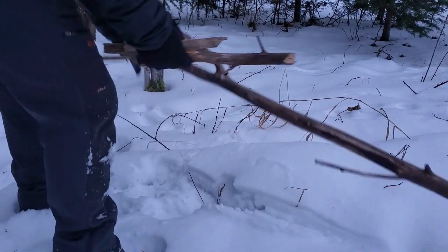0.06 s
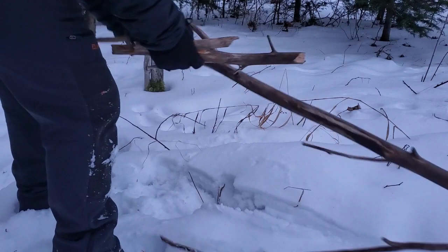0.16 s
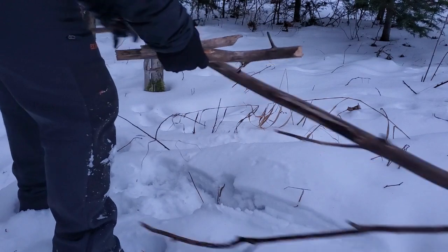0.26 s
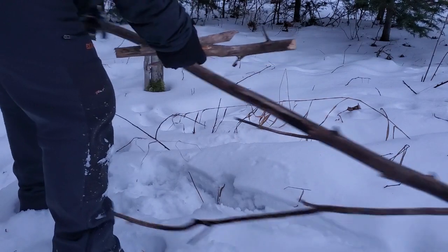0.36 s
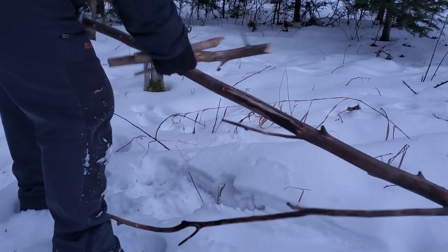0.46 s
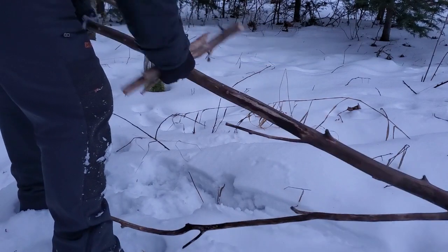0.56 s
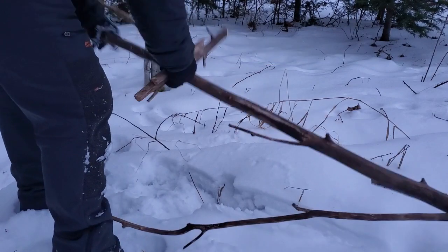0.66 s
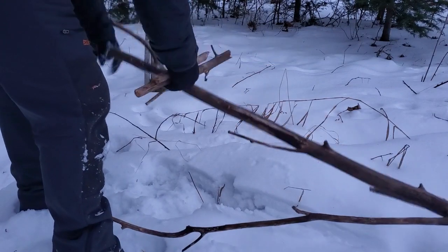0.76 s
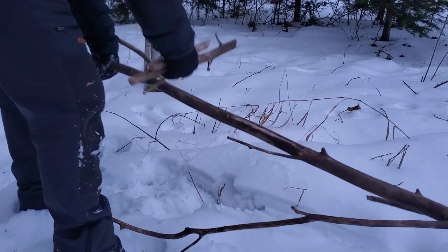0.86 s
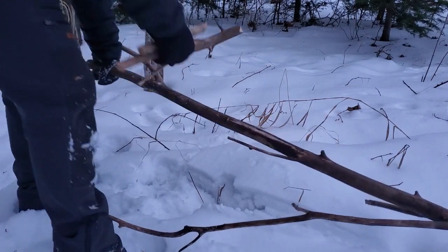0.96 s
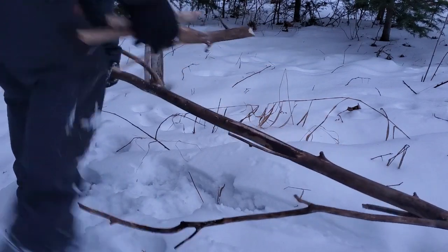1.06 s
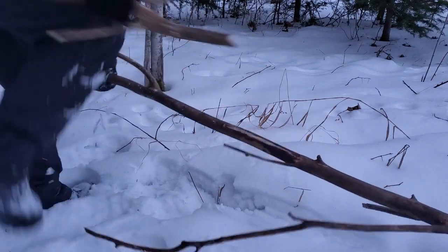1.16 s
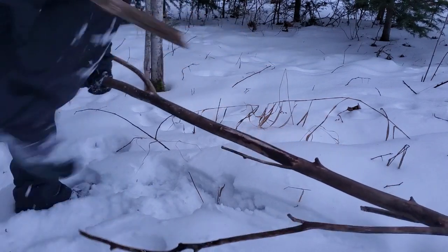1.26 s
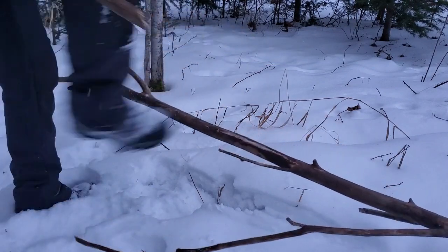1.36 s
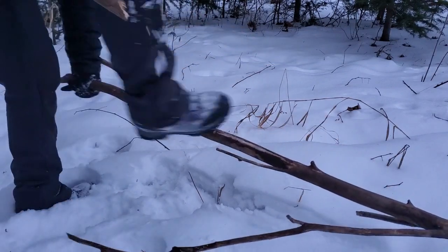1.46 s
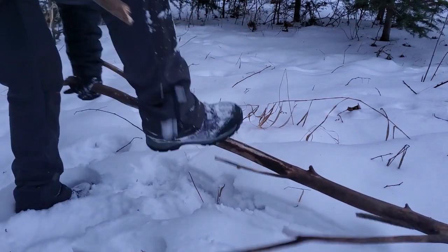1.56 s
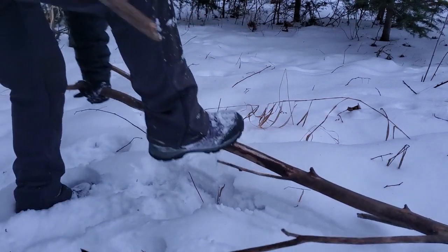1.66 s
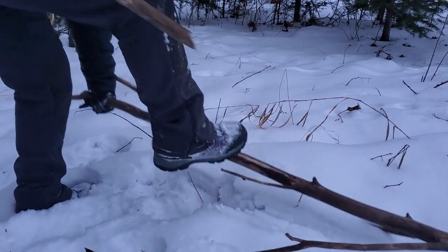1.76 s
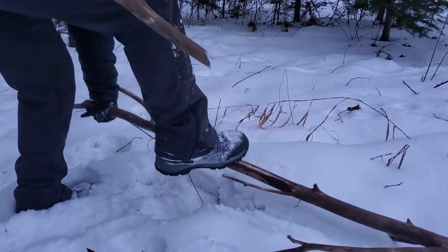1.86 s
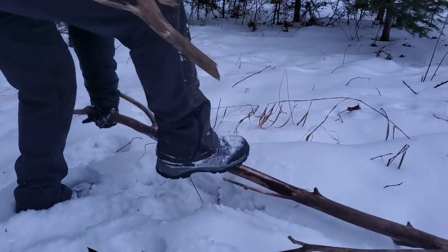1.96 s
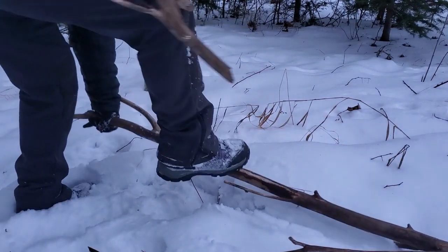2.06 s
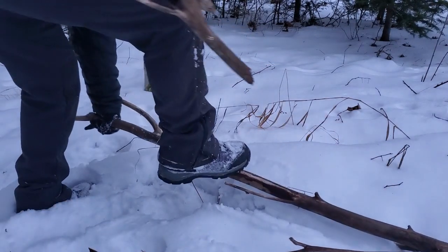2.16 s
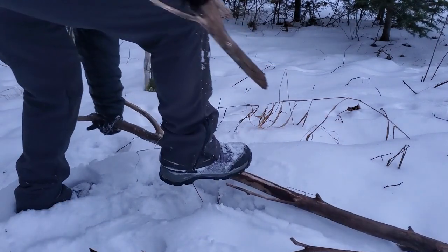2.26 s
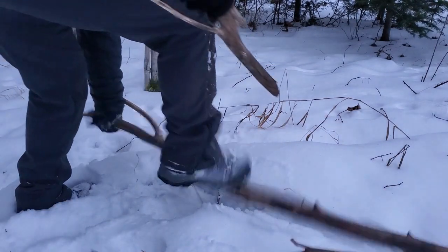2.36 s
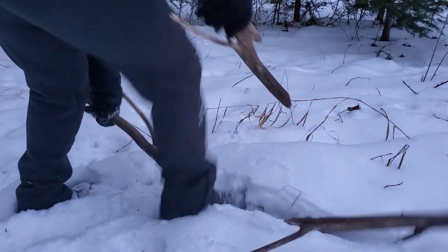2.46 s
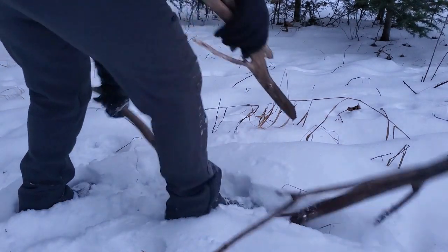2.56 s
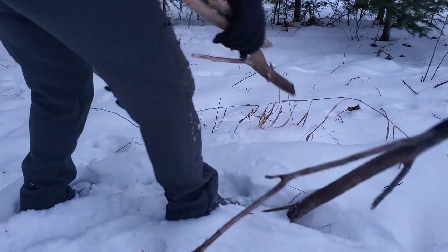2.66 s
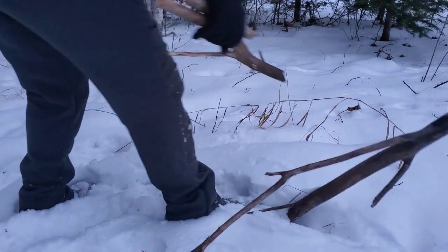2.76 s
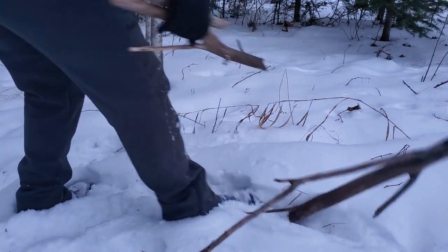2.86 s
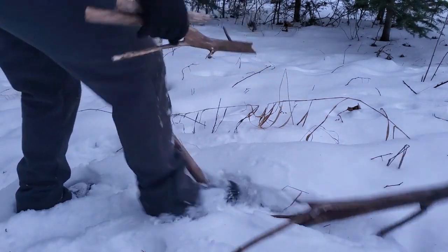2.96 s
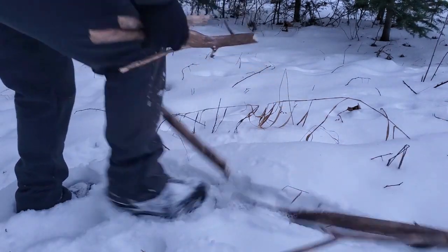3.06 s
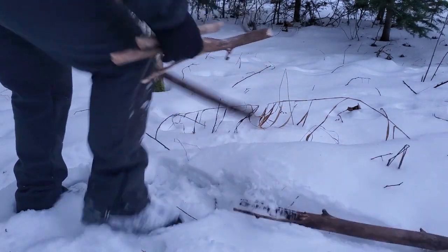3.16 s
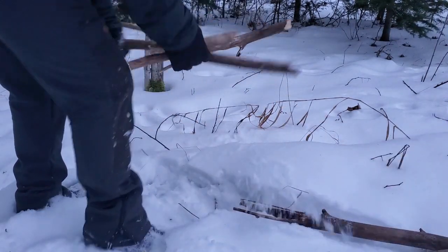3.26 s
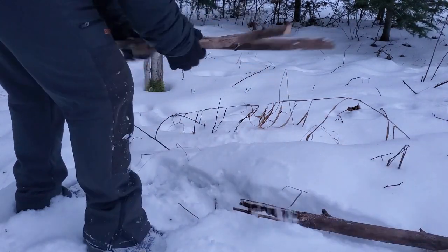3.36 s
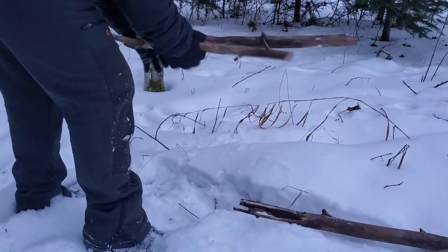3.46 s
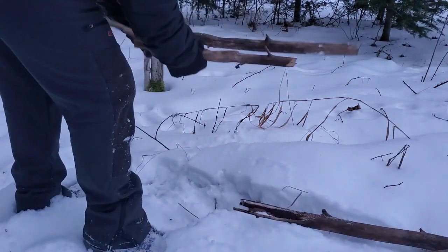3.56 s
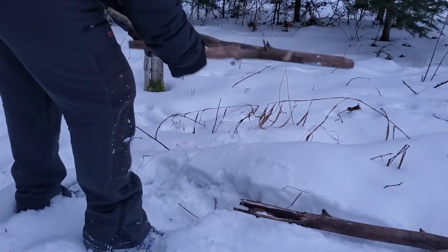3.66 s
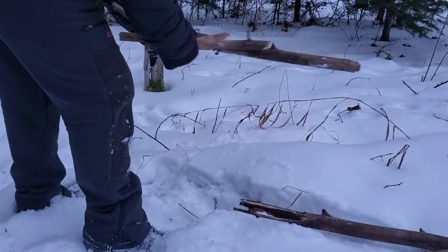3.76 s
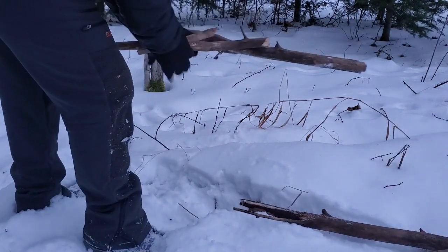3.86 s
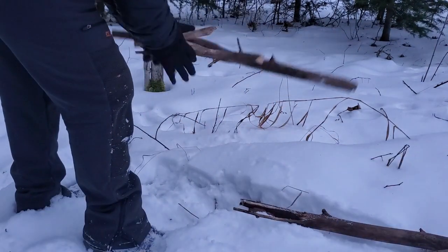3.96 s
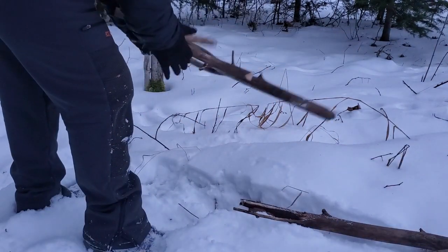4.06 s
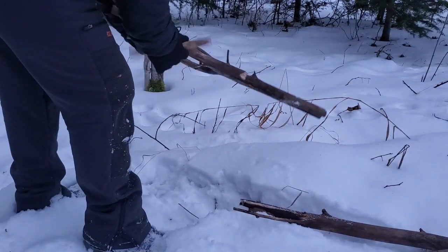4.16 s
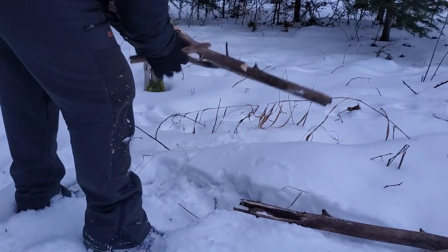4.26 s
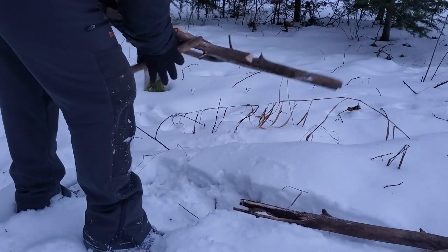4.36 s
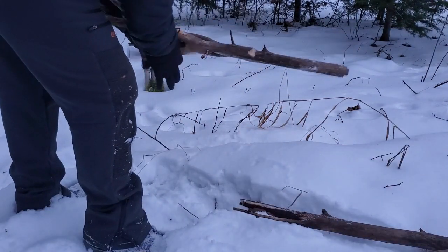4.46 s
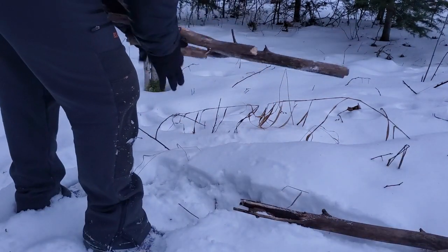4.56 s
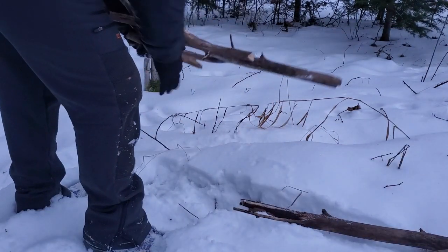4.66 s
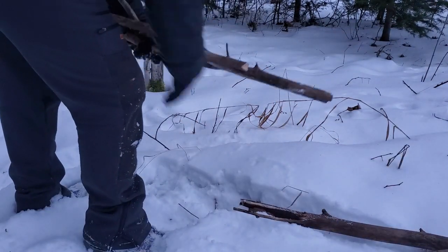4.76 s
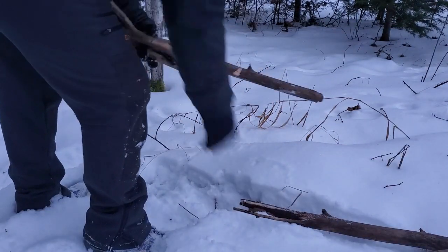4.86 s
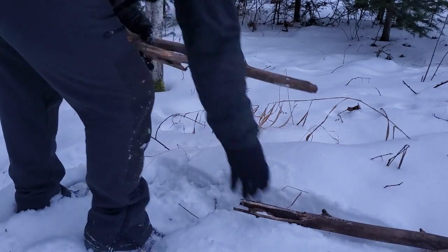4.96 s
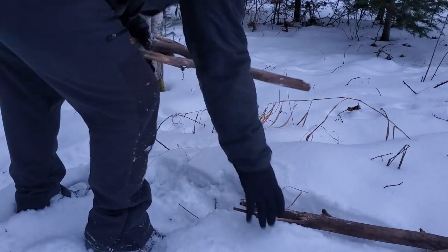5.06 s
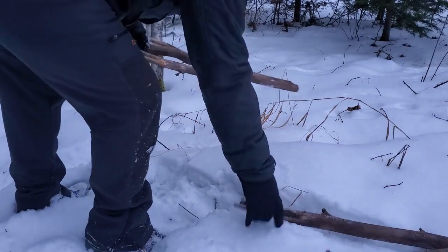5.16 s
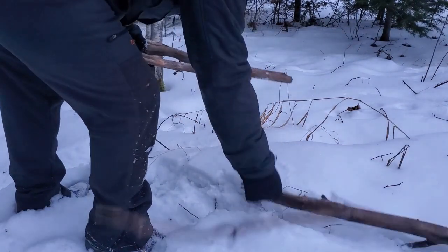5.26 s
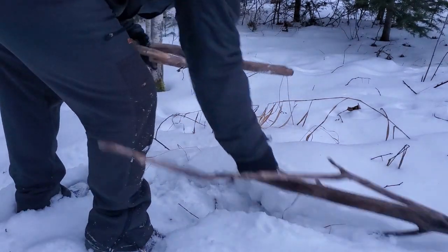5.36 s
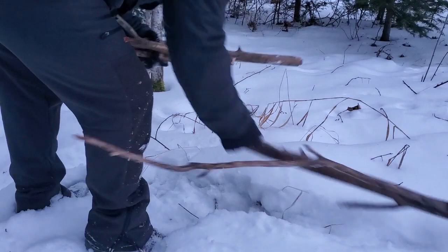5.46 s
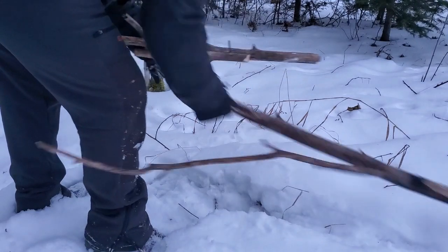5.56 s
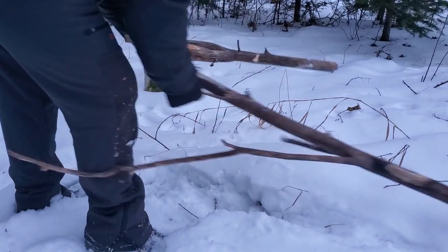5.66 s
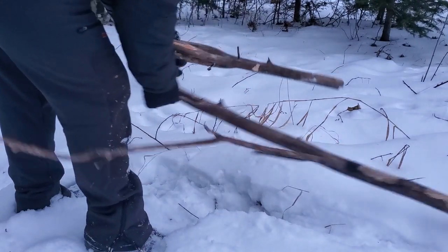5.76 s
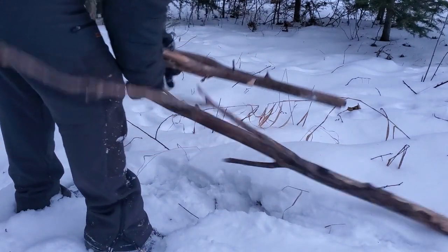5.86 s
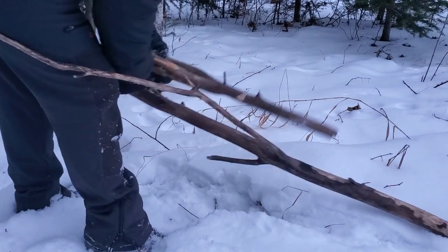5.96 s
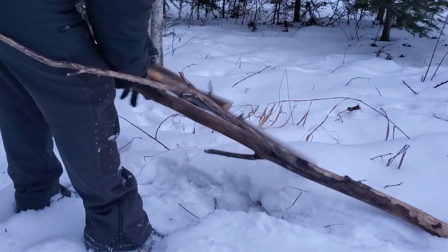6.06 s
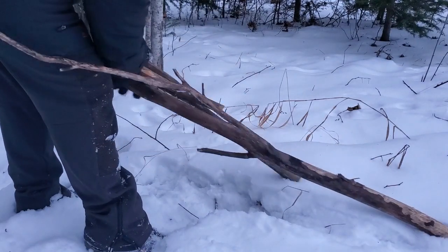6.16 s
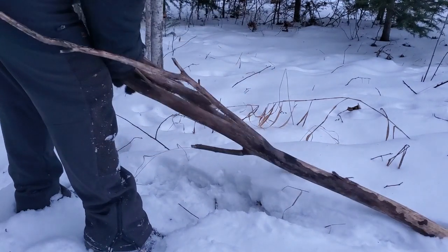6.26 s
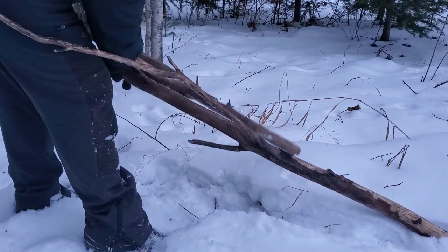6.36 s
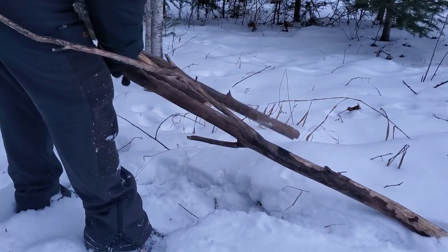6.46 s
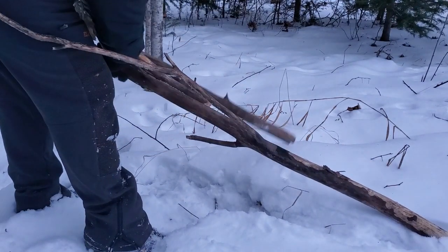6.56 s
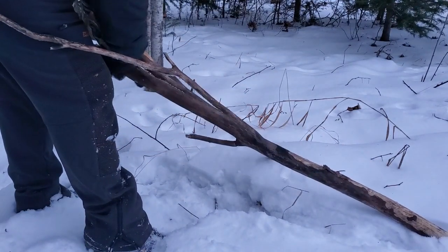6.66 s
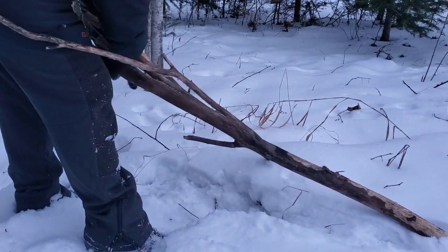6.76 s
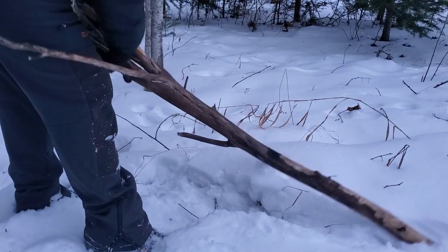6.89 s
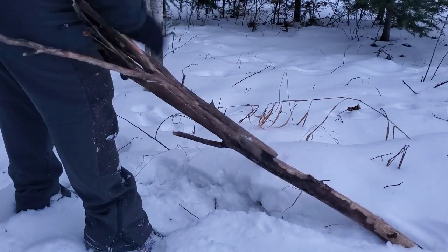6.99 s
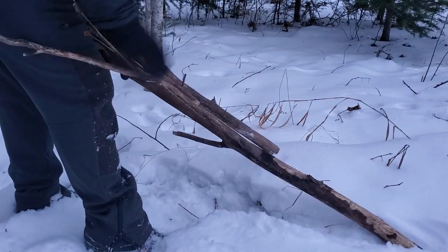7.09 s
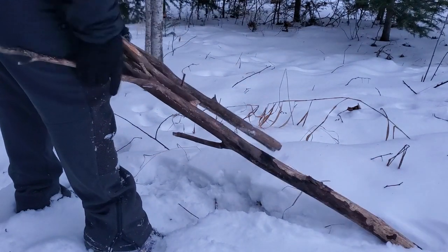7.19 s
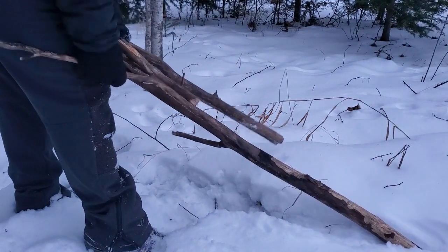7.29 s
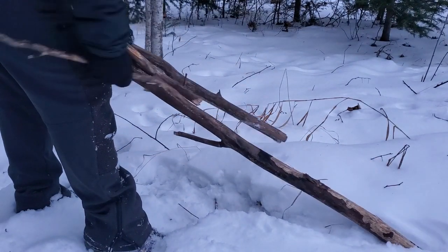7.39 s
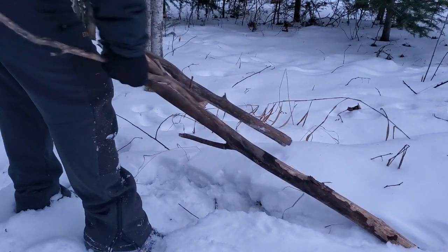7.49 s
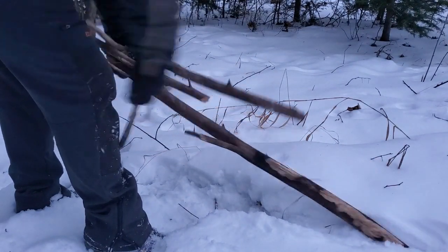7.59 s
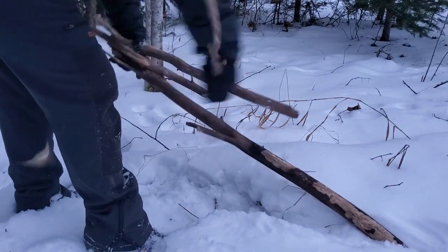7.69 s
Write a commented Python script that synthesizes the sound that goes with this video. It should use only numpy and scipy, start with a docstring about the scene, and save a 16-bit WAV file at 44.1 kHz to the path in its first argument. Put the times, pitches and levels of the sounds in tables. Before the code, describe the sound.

A close outdoor microphone in still winter woods picks up very faint hush and low puffs of air rumble. At 0-0.5 s snow crunches and a limb scrapes through a glove with a woody, singing rasp, clothes rustling. Near 1.1 s come faint crunches, then at 1.5-1.85 s a soft boot thud, snow and a small knock. From 2.0 to 2.2 s the sole grinds and slips in tiny jerks on bark. Fibres tick at 2.28 s; the limb cracks hard at 2.37 s and its end at 2.46 s, brighter, with a low thud, crunch and brief tree echo. Snow crunches again at 2.95-3.3 s. From 3.4 to 7.2 s there are sparse, quiet hollow stick knocks, bark rubs and rustling, with a clearer knock at 5.7 s and an air puff near 4.4 s. Splinters scrape at 7.4 s, a thin stick snaps loudly at 7.52 s, knocks at 7.55 s, and everything settles.

```python
"""Snapping dead wood in snow

A boot bears down on a dry limb until its fibres tick and it breaks in two places; a thin stick is snapped by hand.
Cracks are torn noise bursts over ringing wood modes; knocking sticks add ticks, hollow rings and rough chatter.
Snow, bark, gloves and clothes are clumped grains of friction shaped by spectra and resonances.
Trunks send back cracks and knocks as a fading noise tail; air rumbles on the microphone over a faint hush."""
import sys
import numpy as np
from scipy import signal
from scipy.fft import rfft, irfft, next_fast_len
from scipy.io import wavfile
from scipy.ndimage import map_coordinates

SR = 44100
rng = np.random.default_rng(int(sys.argv[2]) if len(sys.argv) > 2 else 0)


def persist_wave(psi):
    """Save psi, clipped to +-1, as 16-bit WAV."""
    counts = np.round(np.clip(psi, -1, 1) * 32767).astype(np.int16)
    wavfile.write(sys.argv[1], SR, np.atleast_2d(counts).T)


N = 340893

# fibres failing in the limb under the boot: t/s, tear level/dB, tear t60/s, ring level/dB
LIMB_CRACKS = [(2.2836, -25.5, 0.0066, -44.5), (2.2882, -19.5, 0.0084, -35.5), (2.2995, -18, 0.0041, -45),
               (2.3664, -8, 0.007, -25.5), (2.3701, -12.5, 0.0088, -30), (2.3754, -8.5, 0.013, -6.5),
               (2.3775, -8, 0.01, -7.5), (2.389, -23.5, 0.011, -27.5), (2.404, -26.5, 0.0064, -32),
               (2.4095, -25.5, 0.0054, -33.5)]
# modes of the limb: f/Hz, level/dB, t60/s
LIMB_MODES = [(766, -26, .04), (1570, -9, 0.0087), (1990, -3, 0.012), (2520, -1.5, 0.024),
              (3134, -5, 0.018), (4700, -6, 0.016), (7220, -7.5, 0.014)]
# the short end breaking off: t/s, tear level/dB, tear t60/s, ring level/dB
END_CRACKS = [(2.4581, -15.5, 0.0091, -20.5), (2.4592, -9.5, 0.01098, -8.5)]
# modes of the short end: f/Hz, level/dB, t60/s
END_MODES = [(896, -20.5, 0.011), (2200, 1, 0.019), (2536, -3.5, .012), (4580, -20.5, .02)]


def limb_break():
    """The limb's fibres tick and give way, then its short end breaks off with a brighter tear."""
    limb = fracture(LIMB_CRACKS, LIMB_MODES, rise=0.00022, sizzle_db=-2.5)
    short_end = fracture(END_CRACKS, END_MODES, rise=.0003, sizzle_db=6.0)
    return limb + short_end


# the thin stick giving way: t/s, tear level/dB, tear t60/s, ring level/dB
STICK_CRACKS = [(7.413, -31, 0.0069, -70), (7.5156, -2.5, 0.0083, -4), (7.518, -20, 0.0061, -13),
                (7.592, -44, 0.013, -35.5)]
# modes of the thin stick: f/Hz, level/dB, t60/s
STICK_MODES = [(170, -29, 0.025), (694, -19, 0.083), (978, -20.5, 0.035), (2215, -2, 0.016),
               (2956, -2.5, 0.017), (3133, 1, 0.011), (3880, -11.5, 0.018), (5500, -6, 0.014)]


def stick_snap():
    """Bent by hand, the thin stick tears its fibres and rings in its own modes."""
    return fracture(STICK_CRACKS, STICK_MODES, rise=0.00019, sizzle_db=4.0)


def fracture(cracks, modes, rise, sizzle_db):
    """Each bundle of fibres tears, and the released strain rings the piece of wood."""
    out, t = np.zeros(N), np.arange(SR // 6) / SR
    onset = 1 - np.exp(-t / rise)  # rise is a time constant in seconds
    for start, tear_db, t60, ring_db in cracks:
        fibres = amp(tear_db) * tear(t, t60, sizzle_db)
        wood = amp(ring_db) * ring(modes, t)
        add(out, start, (fibres + wood) * onset)
    return out


# spectrum of parting fibres: f/Hz, relative level per Hz/dB
TEAR_SPECTRUM = [(100, -18), (600, -11), (1500, -7.5), (3500, -2.5), (6000, -4.5), (7500, 1), (8800, 0.5),
                 (9600, -14), (10600, -20), (12300, -8.5), (14000, -15), (15500, -14)]


def tear(t, t60, sizzle_db=0):
    """Parting fibres give a noise burst that dies within milliseconds; sizzle tilts its treble."""
    fade = amp(-60 * t / t60)
    sizzle = [(7000, 0), (12000, sizzle_db)]
    burst = coloured(fade * rng.standard_normal(len(t)), TEAR_SPECTRUM, sizzle)
    return unit(burst) * np.sqrt(np.mean(fade ** 2))  # the colour leaves the level alone


def ring(modes, t):
    """One sharp blow sets off damped sines, each with a random phase."""
    return sum(amp(db - 60 * t / t60) * np.sin(2 * np.pi * (hz * t + rng.random())) for hz, db, t60 in modes)


# gathered sticks knocking together: t/s, level/dB, pitch f/Hz, ring t60/s, tick level relative to the knock/dB
KNOCKS = [(1.755, -33.5, 2210, .022, -2), (3.425, -44, 2374, 0.014, -5), (3.802, -55.5, 1665, .025, 0),
          (3.86, -35, 932, 0.041, -25), (4.237, -44, 1498, .036, -16), (4.365, -37, 1756, 0.011, -24),
          (4.513, -48, 856, .036, -12), (4.636, -55.5, 873, 0.033, -12.5), (4.836, -52, 1396, 0.065, -18),
          (4.975, -44.5, 907, 0.03, -9), (5.668, -39.5, 1060, 0.035, 0.5), (5.7, -26, 1724, 0.022, -21),
          (6.078, -48, 1005, 0.034, 5.5), (6.455, -42, 2180, .02, -12), (6.459, -47, 920, .07, -14),
          (6.814, -54, 1040, 0.021, 13), (6.867, -50, 1010, 0.025, 9.5), (6.902, -43, 1029, 0.09, 4),
          (6.959, -45.5, 1100, 0.017, 10), (7.184, -50, 1350, .032, -18), (7.548, -25, 1880, 0.014, -20),
          (7.5543, -16, 1114, 0.011, -12)]
# modes of a knocked stick: multiple of the pitch, mean level/dB
BENDING_MODES = [(.36, -13.5), (.55, -9), (.76, -12), (1, -1.5), (1.22, -12.5), (1.6, -13), (2.3, -20.5)]


def knocks(scatter_db, rise, chatter_db, chatter_width):
    """Stick meets stick: a tick, a short hollow ring and a chatter of rough bark."""
    out, t = np.zeros(N), np.arange(SR // 8) / SR
    onset = 1 - np.exp(-t / rise)
    for start, db, pitch, t60, tick_db in KNOCKS:
        modes = [(pitch * k, level + rng.normal(0, scatter_db), t60) for k, level in BENDING_MODES]
        wood = ring(modes, t)
        # chatter_width is the resonance width as a share of the pitch
        body = resonant([(pitch * k, pitch * chatter_width, level) for k, level in BENDING_MODES], floor_db=-50)
        chatter = unit(coloured(rng.standard_normal(len(t)), body)) * amp(chatter_db - 60 * t / t60)
        tick = amp(tick_db) * tear(t, t60=.009)
        blow = wood / np.abs(wood).max() + chatter + tick
        add(out, start, amp(db) * blow * onset)
    return out


# boots and wood pushing through snow: crest t/s, length/s, level/dB, body tilt/dB
CRUNCHES = [(.026, 0.024, -33, -10.5), (.083, 0.078, -34.5, -1.5), (.418, 0.097, -43, -3),
            (1.062, 0.098, -48, 1), (1.19, 0.083, -54.5, 3), (1.566, 0.035, -46, 9.5),
            (1.627, 0.059, -43, -2.5), (1.702, 0.012, -43.5, -19), (1.785, 0.056, -40.5, 0.5),
            (1.827, 0.029, -44, -1), (2.402, 0.038, -34.5, 1), (2.462, 0.083, -29, 1.5),
            (2.51, 0.078, -35, 1.5), (2.955, .016, -39.5, -8), (3.01, 0.12, -43, -1),
            (3.077, .075, -35.5, 2.5), (3.107, 0.013, -41, 16), (3.132, 0.038, -45.5, 4),
            (3.24, .08, -39.5, 7), (3.28, .036, -32, -13)]
# crunch shape: share of length swelling, curvature of swell, curvature of fall, drop at both ends/dB,
# fizz/dB, fizz per body/(dB per dB)
CRUNCH_SHAPE = (.65, 1.5, 1.5, 12, .5, 0.42)
# spectrum of packing snow: f/Hz, relative level per Hz/dB
SNOW_SPECTRUM = [(76, -30.5), (130, -2.5), (202, -6.5), (410, -4), (491, -6.5), (735, -2.5), (2010, -2),
                 (2510, -1), (3750, -6.5), (5080, -6), (5960, -11), (8070, -5.5), (10300, -22.5),
                 (12800, -14), (16000, -23.5)]
TRICKLE_DB, TRICKLE_T60_S = -21, .5  # loose snow falling back, relative to the crunch trail


def snow():
    """Snow packs with a crunch, and loose crumbs trickle after it in proportion."""
    crunch = strokes(CRUNCHES, CRUNCH_SHAPE, [SNOW_SPECTRUM], rate=3500, spread_db=2.5, smooth_db=-2.5,
                     clump_db=1.8, clump_rate=280)
    power_fade = amp(-60 * np.arange(SR) / SR / TRICKLE_T60_S) ** 2
    power_trail = signal.fftconvolve(crunch ** 2, power_fade / power_fade.sum())[:N]
    loosened = np.sqrt(np.abs(power_trail))
    crumb_tilt = [(600, -3), (2400, -2.5)]
    crumbs = unit(coloured(grains(N, rate=1500, spread_db=3.5, smooth_db=0), SNOW_SPECTRUM, crumb_tilt))
    return crunch + amp(TRICKLE_DB) * loosened * crumbs


# the sole bearing down on the limb: crest t/s, length/s, level/dB, body tilt/dB
PRESSES = [(1.998, .06, -44, 1), (2.17, .17, -46, 3)]
# the sole jerking over the bark: crest t/s, level/dB
SLIPS = [(1.974, -49), (2.016, -45), (2.04, -40), (2.082, -44), (2.192, -37), (2.213, -43)]
SLIP_S, SLIP_BODY_DB = 0.023, -1  # length and body tilt that all slips share
# press and slip shapes: share of length swelling, curvature of swell, curvature of fall, drop at both ends/dB,
# fizz/dB, fizz per body/(dB per dB)
PRESS_SHAPE = (0.67, 1, 1, 12, 2, -0.66)
SLIP_SHAPE = (0.14, 1.3, 1.5, 23, 1.1, .1)
# resonances under the sole: f/Hz, width/Hz, level/dB
SOLE_BODY = [(1330, 230, 1), (2260, 220, -6.5), (3300, 320, 0), (4531, 350, -2.5), (8730, 1500, -1.5)]


def sole():
    """The boot grinds on the limb as weight comes on, and slips in short jerks."""
    colour = [SNOW_SPECTRUM, resonant(SOLE_BODY, floor_db=-6.5)]
    grind = strokes(PRESSES, PRESS_SHAPE, colour, rate=1100, spread_db=5, smooth_db=-6.5,
                    clump_db=2.0, clump_rate=200)
    slip_rows = [(crest, SLIP_S, db, SLIP_BODY_DB) for crest, db in SLIPS]
    jerks = strokes(slip_rows, SLIP_SHAPE, colour, rate=2600, spread_db=2.6, smooth_db=-6,
                    clump_db=2, clump_rate=290)
    return grind + jerks


# the limb sliding through the glove: t/s, level/dB
DRAG = [(0.1, -31), (0.154, -62), (0.284, -46.5), (0.314, -51.5), (0.418, -42.5), (0.458, -58.5),
        (0.662, -66), (0.668, -57), (0.84, -71)]
# resonances the glove excites in the limb: f/Hz, width/Hz, level/dB
DRAG_BODY = [(940, 110, -14), (1383, 54, 5.5), (2050, 250, 3.5), (2580, 190, 8), (2900, 210, -4),
             (4600, 480, -1.5), (5200, 330, -6.5)]


def drag(clump_db, clump_rate, fade_s):
    """The limb slides through the glove and sings in its resonances."""
    t = np.arange(N) / SR
    first, last = DRAG[0][0], DRAG[-1][0]
    sliding = np.clip(np.minimum(t - first, last - t) / fade_s, 0, 1)
    slips = grains(N, rate=2000, spread_db=3, smooth_db=.5) * amp(clump_db * wobble(N, clump_rate))
    singing = unit(coloured(slips, resonant(DRAG_BODY, floor_db=-39)))
    return sliding * amp(curves(DRAG)[0]) * singing


# bark sliding on gloves, sleeves and other sticks: crest t/s, length/s, level/dB, body tilt/dB
RUBS = [(.535, 0.069, -56, -10), (.875, 0.047, -49.5, -9), (3.428, 0.044, -57.5, -27),
        (3.57, 0.059, -65, -14), (4.075, 0.052, -68.5, 6), (4.978, 0.041, -47, 2), (5.145, .03, -52, -32),
        (5.252, 0.053, -43, -15), (5.284, 0.043, -43, -0.5), (5.585, 0.11, -57, 3.5),
        (5.7, 0.087, -52.5, 5), (5.819, 0.038, -56.5, -1), (5.88, .09, -57.5, -5), (6.098, 0.047, -53.5, 8),
        (6.235, 0.089, -61, -1), (6.826, 0.032, -53, -6), (6.907, .06, -43, -8.5), (6.985, 0.073, -58, -2)]
# rub shape: share of length swelling, curvature of swell, curvature of fall, drop at both ends/dB,
# fizz/dB, fizz per body/(dB per dB)
RUB_SHAPE = (.24, 1.4, 1.5, 12.5, 5.8, 0.12)
# spectrum of rubbed bark: f/Hz, relative level per Hz/dB
BARK_SPECTRUM = [(130, -54), (220, -17), (693, -7.5), (758, -8), (1010, -9.5), (1280, -1.5), (1790, -6),
                 (2070, -6), (4020, -8.5), (5450, -9.5), (6070, -20), (7950, -8.5), (10600, -37.5),
                 (12400, -22.5), (16000, -37)]
# resonances of the gathered sticks: f/Hz, width/Hz, level/dB
BUNDLE_BODY = [(590, 77, -0.5), (976, 70, 0.5), (1910, 130, -1), (2523, 90, -3), (3130, 260, -0.5),
               (4000, 110, -1.5), (5000, 180, -2)]


def bark_rubs():
    """Bark slides in short strokes that sound through the resonances of the bundle."""
    colour = [BARK_SPECTRUM, resonant(BUNDLE_BODY, floor_db=-6.5)]
    return strokes(RUBS, RUB_SHAPE, colour, rate=2400, spread_db=3.2, smooth_db=-0.5,
                   clump_db=3.0, clump_rate=232)


# the thin stick's splinters dragging apart: crest t/s, length/s, level/dB, body tilt/dB
SPLINTERS = [(7.425, 0.11, -58, 18), (7.483, 0.051, -55.5, 21), (7.53, 0.044, -39, 7)]
# splinter shape: share of length swelling, curvature of swell, curvature of fall, drop at both ends/dB,
# fizz/dB, fizz per body/(dB per dB)
SPLINTER_SHAPE = (0.2, 1.5, 1.6, 9, 10, -0.4)


def splinter_drag():
    """Splinters scrape past each other in sparse, strongly uneven grains."""
    return strokes(SPLINTERS, SPLINTER_SHAPE, [BARK_SPECTRUM], rate=1200, spread_db=5.5, smooth_db=-20.0,
                   clump_db=4.0, clump_rate=310)


def strokes(rows, shape, spectra, rate, spread_db, smooth_db, clump_db, clump_rate):
    """Friction that swells and dies; its grains come in clumps as the surfaces stick and let go."""
    out = np.zeros(N)
    rise_share, rise_power, fall_power, edge_db, fizz_db, fizz_per_body = shape
    for crest, length, db, body_db in rows:
        rise = length * rise_share
        fall = length - rise
        t = np.arange(-2 * rise, 3 * fall, 1 / SR)  # the crest is at zero
        before, after = np.abs(t / rise) ** rise_power, np.abs(t / fall) ** fall_power
        swell = amp(-edge_db * np.where(t < 0, before, after))
        slips = grains(len(t), rate, spread_db, smooth_db) * amp(clump_db * wobble(len(t), clump_rate))
        tilt = [(600, body_db), (2400, 0), (7500, fizz_db + fizz_per_body * body_db)]
        add(out, crest - 2 * rise, amp(db) * swell * unit(coloured(slips, tilt, *spectra)))
    return out


def grains(size, rate, spread_db, smooth_db):
    """Tiny slips of uneven strength, rate a second on average, over a smooth hiss."""
    hits = rng.random(size) < rate / SR
    signs = rng.choice([-1, 1], size)
    strength = amp(spread_db * np.minimum(rng.exponential(size=size), 3))
    hiss = amp(smooth_db) * rng.standard_normal(size)
    return unit(unit(hits * signs * strength) + hiss)


# weight landing in the snow: t/s, level/dB, pitch f/Hz, t60/s
THUDS = [(1.535, -40.5, 227, 0.045), (1.552, -36.5, 249, 0.055), (2.462, -23.5, 181, 0.044),
         (3.108, -39.5, 129.8, 0.14)]


def thuds(rise):
    """Packed snow gives way with a soft, low push."""
    out, t = np.zeros(N), np.arange(SR // 4) / SR
    for start, db, hz, t60 in THUDS:
        add(out, start, ring([(hz, db, t60)], t) * (1 - np.exp(-t / rise)))
    return out


# clothes shifting as the body moves, before trim and flutter: t/s, cloth level/dB, hiss level/dB
RUSTLE = [(0, -46.5, -52.5), (0.5, -60.5, -67.5), (0.95, -67.5, -68.5), (1.33, -74, -75.5), (1.5, -76, -81),
          (1.68, -59, -61), (2.33, -51, -61), (2.56, -43.5, -49.5), (2.8, -60.5, -62), (3.15, -55.5, -56),
          (3.38, -86, -69), (3.68, -86, -89), (3.98, -75, -80.5), (4.72, -79, -85), (5.05, -65.0, -64.0),
          (5.5, -67, -70.5), (5.76, -60.5, -61.5), (6.02, -72.5, -68.5), (6.4, -66, -70.5),
          (6.62, -77.5, -79), (6.87, -65, -66.5), (7.12, -73.5, -80.5), (7.48, -53.5, -58)]
# spectra of cloth and of its hiss: f/Hz, relative level per Hz/dB
CLOTH_SPECTRUM = [(100, -18), (300, -4), (600, -5), (1050, 0), (1800, -2), (2600, -2), (3600, -5),
                  (5000, -27.5)]
HISS_SPECTRUM = [(2800, -24.5), (4200, 2.5), (5400, 2.5), (6300, -5.5), (8400, 2), (9500, -10),
                 (10600, -20.5), (12700, -10.5), (16000, -18)]
SETTLE_S, SETTLE_DB_PER_S = 7.52, 121  # the body comes to rest after the main snap


def rustle(cloth_db, hiss_db, flutter_db, body_floor_db):
    """Winter clothes shift against the sticks with a fluttering level, then settle."""
    cloth_level, hiss_level = curves(RUSTLE)
    settled_db = SETTLE_DB_PER_S * np.maximum(np.arange(N) / SR - SETTLE_S, 0)
    motion_db = flutter_db * wobble(N, rate=39) - settled_db
    body = resonant(BUNDLE_BODY, body_floor_db)
    cloth = unit(coloured(grains(N, rate=2300, spread_db=4.0, smooth_db=2.0), CLOTH_SPECTRUM, body))
    hiss = unit(coloured(grains(N, rate=900, spread_db=5.5, smooth_db=1.5), HISS_SPECTRUM))
    return amp(cloth_level + cloth_db + motion_db) * cloth + amp(hiss_level + hiss_db + motion_db) * hiss


def patchy(x, depth_db, width_hz, life):
    """The contact point wanders, so patches of the spectrum come and go; life is in seconds."""
    z = signal.stft(x, nperseg=512)[2]
    across_pitch = signal.windows.gaussian(61, width_hz * 512 / SR)
    across_time = signal.windows.gaussian(61, life * SR / 256)
    patch = np.outer(across_pitch, across_time)
    field = unit(signal.fftconvolve(rng.standard_normal(z.shape), patch, "same"))
    return signal.istft(z * unit(amp(depth_db * field)), nperseg=512)[1][:N]


# the wood's answer, before reach scales it: f/Hz, t60/s
TREES = [(150, .3), (700, 0.18), (2800, .55), (8000, 0.49), (15000, 0.62)]


def forest(x, wet_db, build, reach):
    """Many trunks send back weak echoes that build, then fade by pitch; reach stretches the tail."""
    echoes = grains(SR, rate=2300, spread_db=4.5, smooth_db=-5)
    hz, t, z = signal.stft(echoes, SR, nperseg=256)
    t60 = reach * along(TREES, hz)[:, None]
    fade = amp(-60 * t / t60) * (1 - np.exp(-t / build))
    tail = signal.istft(z * fade, SR, nperseg=256)[1]
    return x + amp(wet_db) * signal.fftconvolve(x, tail / np.linalg.norm(tail))[:N]


# air on the microphone, before trim and eddies: t/s, level/dB
AIR = [(0.0, -54), (0.04, -50.5), (1.31, -64.5), (2.37, -45), (2.88, -68.5), (3.25, -58.5), (3.64, -85),
       (4.05, -58.5), (4.3, -56), (4.37, -38), (4.5, -54), (5.64, -57), (5.77, -49.5), (6.03, -73),
       (6.11, -57.5), (7.45, -59), (7.6, -52.5), (7.73, -63.5)]
# spectrum of the rumble: f/Hz, relative level per Hz/dB
RUMBLE_SPECTRUM = [(15, -13.5), (30, -4), (47, 0), (65, -4), (100, -10.5), (150, -28.5), (250, -38),
                   (600, -70)]


def air(level_db, eddy_db, eddy_rate):
    """Slow eddies press on the microphone, in puffs."""
    puffs = amp(curves(AIR)[0] + level_db + eddy_db * wobble(N, eddy_rate))
    return coloured(puffs * rng.standard_normal(N), RUMBLE_SPECTRUM)


# the still air of the wood: f/Hz, relative level per Hz/dB
HUSH_SPECTRUM = [(100, 3.5), (300, 5.5), (800, 2), (2000, -11), (5000, -14), (8500, -13), (10500, -25),
                 (13000, -20.5), (16000, -27.5)]


def hush(level_db):
    """Still air lies under everything as steady coloured noise."""
    return amp(level_db) * unit(coloured(rng.standard_normal(N), HUSH_SPECTRUM))


def amp(db):
    """Decibels to gain."""
    return 10 ** (np.asarray(db) / 20)


def unit(x):
    """Scale to rms 1."""
    return x / np.sqrt(np.mean(x ** 2) + 1e-20)


def along(points, hz):
    """Interpolate (Hz, value) points on a log axis."""
    f, v = np.transpose(points)
    return np.interp(np.log(hz + 1), np.log(f + 1), v)


def curves(rows):
    """One value per sample for each column after the time."""
    s, *cols = np.transpose(rows)
    return [np.interp(np.arange(N) / SR, s, c) for c in cols]


def add(track, s, sound):
    """Mix a sound into a track from time s, trimmed at both ends of the track."""
    start = round(s * SR)
    room, sound = track[max(start, 0):], sound[max(-start, 0):]
    room[:len(sound)] += sound[:len(room)]


def coloured(x, *spectra):
    """Causal minimum-phase filter with the summed dB of the spectra; white noise keeps its power."""
    size = 2 * next_fast_len(len(x) // 2 + SR // 20)
    hz = np.fft.rfftfreq(size, 1 / SR)
    gain = unit(amp(sum(along(p, hz) for p in spectra)))
    cepstrum = irfft(np.log(gain))
    # folding the cepstrum forward in time makes the filter causal
    cepstrum[1:size // 2] *= 2
    cepstrum[size // 2 + 1:] = 0
    return irfft(rfft(x, size) * np.exp(rfft(cepstrum)))[:len(x)]


def resonant(body, floor_db):
    """The (Hz, dB) spectrum of a set of resonances over a flat floor."""
    hz = np.geomspace(100, SR / 2, 1500)
    peaks = sum(amp(db) ** 2 / (1 + (2 * (hz - fc) / width) ** 2) for fc, width, db in body)
    return np.column_stack([hz, 10 * np.log10(amp(floor_db) ** 2 + peaks)])


def wobble(size, rate):
    """A smooth random curve, rate knots a second."""
    knots = rng.standard_normal(int(size * rate / SR) + 4)
    return map_coordinates(knots, [np.arange(size) * rate / SR])


def scene():
    """Breaking wood and knocks among the trees, with friction, thuds and air close by."""
    woods = forest(limb_break(), wet_db=-17.5, build=0.0018, reach=0.86)
    woods += forest(stick_snap(), wet_db=-17, build=0.0089, reach=0.51)
    bundle = knocks(scatter_db=1, rise=0.00043, chatter_db=-8.5, chatter_width=.3)
    woods += forest(bundle, wet_db=-7, build=0.0034, reach=0.65)
    rubbing = snow() + sole() + drag(clump_db=2.5, clump_rate=100, fade_s=0.032)
    rubbing += bark_rubs() + splinter_drag()
    rubbing += rustle(cloth_db=-3.5, hiss_db=-2, flutter_db=2.43, body_floor_db=-1)
    rubbing = patchy(rubbing, depth_db=2.5, width_hz=80, life=.03)
    background = hush(level_db=-79.5) + air(level_db=-.5, eddy_db=2.0, eddy_rate=11)
    return (woods + rubbing + thuds(rise=0.0025) + background)[None]


TOP_HZ = 16000  # half gain here, with a very steep fall above


def record(dry):
    """The loudest peaks flatten towards full scale, and a steep low-pass ends the treble."""
    held = dry / (1 + dry ** 6) ** (1 / 6)
    size = next_fast_len(N + SR // 2)
    hz = np.fft.rfftfreq(size, 1 / SR)
    low_pass = 1 / (1 + (hz / TOP_HZ) ** 120)
    return irfft(rfft(held, size) * low_pass, size)[:, :N]


dry = scene()
out = record(dry)
persist_wave(out)
```